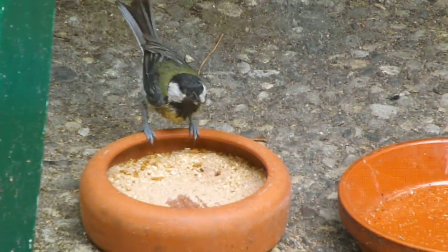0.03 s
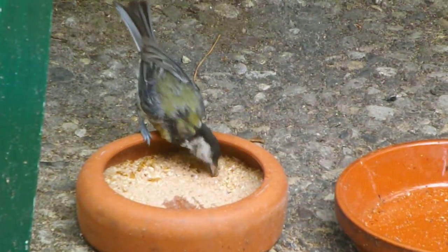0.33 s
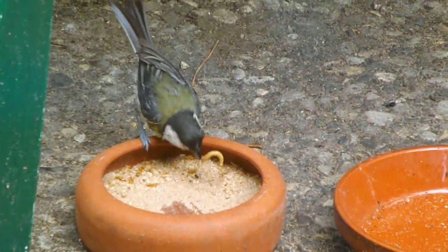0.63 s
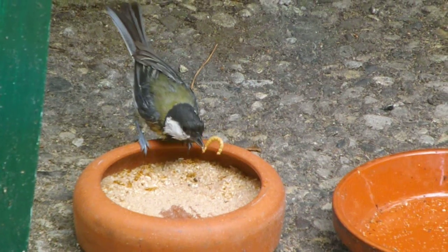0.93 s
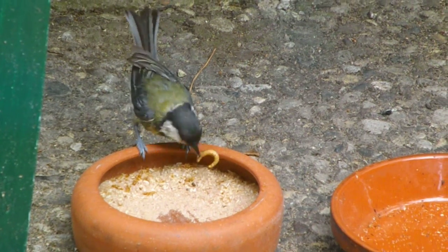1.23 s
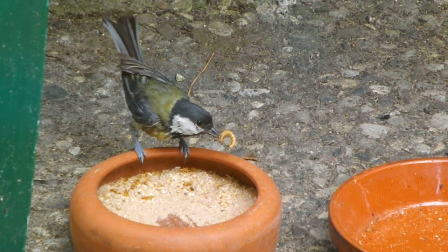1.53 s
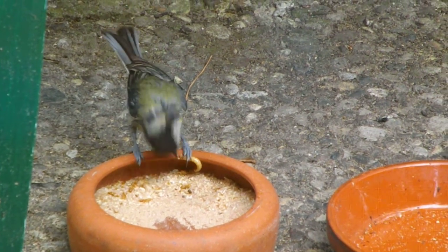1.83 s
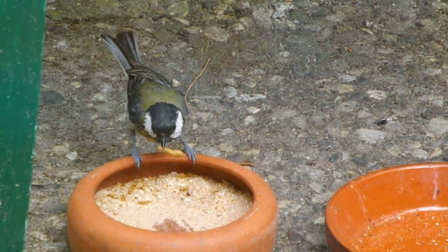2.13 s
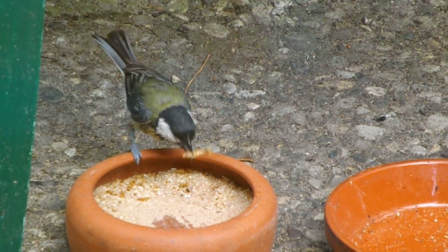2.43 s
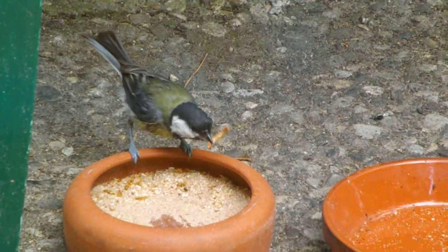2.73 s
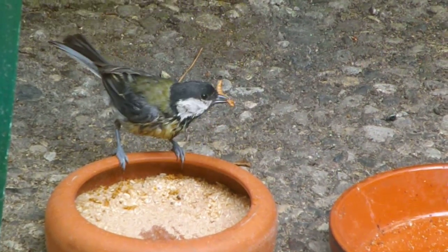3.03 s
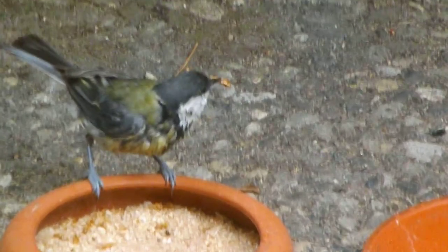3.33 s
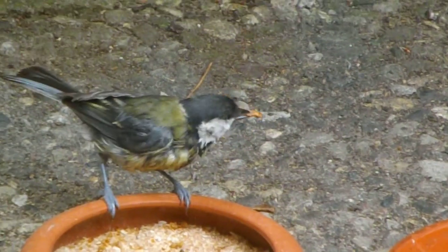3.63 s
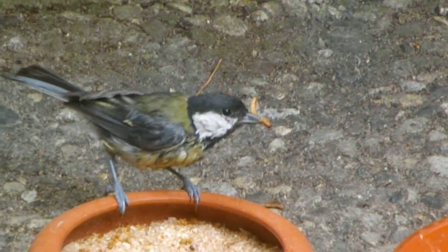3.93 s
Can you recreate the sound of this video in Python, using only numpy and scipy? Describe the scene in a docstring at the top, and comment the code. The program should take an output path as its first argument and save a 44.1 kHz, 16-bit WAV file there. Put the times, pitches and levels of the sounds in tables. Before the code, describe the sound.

Small bird picking at a clay bowl, with sparse ticks, faint scuffs and one sharp click.

```python
"""Small dry sounds come from close by, on a quiet patio. From the start there is an even hiss, with the thin
hum and whirr of a camera. Faint scuffs and light knocks come at 0.2 s and 1.2 s, then a scuff and a tiny squeak
near 2.2 s. From 2.5 s dry ticks ring briefly close to the microphone, with more scuffs between them. A lighter
tick at 3.14 s leads to one sharp double click near 3.28 s, and a last scuff fades away."""
import sys
import numpy as np
from scipy import signal
from scipy.fft import rfft, irfft
from scipy.io import wavfile
from scipy.ndimage import uniform_filter1d

SR = 44100
rng = np.random.default_rng(int(sys.argv[2]) if len(sys.argv) > 2 else 0)


def dump_mix(stems):
    """Bounce the given channels to the path in sys.argv[1] as a 16-bit WAV at rate SR."""
    frames = np.atleast_2d(stems).T  # one column per channel
    limited = np.clip(frames, -1, 1)  # hard clip at full scale
    pcm = np.round(limited * 32767).astype(np.int16)
    wavfile.write(sys.argv[1], SR, pcm)


N = 4 * SR

# Each small contact in a dry tick: t/s, relative level/dB, bass cut f/Hz, treble cut f/Hz
CONTACTS = [(2.5102, -20.5, 1450, 1700), (2.5160, -15, 1500, 1750), (2.6206, -27, 1750, 2600),
            (2.6228, -29, 1750, 2000), (2.6278, -31, 1800, 2600), (2.6366, -21, 1800, 2000),
            (2.6418, -32, 1800, 2600), (2.6820, -38, 2200, 3500), (2.7770, -38, 1700, 3000),
            (3.1382, -10, 1900, 2000), (3.1402, -15, 2500, 2000), (3.2450, -34, 1700, 3200),
            (3.2735, -16, 500, 2730), (3.27489, -9.5, 500, 10000), (3.27514, 2, 500, 3420),
            (3.27694, .8, 500, 2440), (3.27959, -21, 500, 4600), (3.2825, -21, 500, 3260)]
# The short tones of a dry tick: f/Hz, relative level/dB, time to fade by 60 dB t/s
TICK_TONES = [(1510, -11, .023), (1710, 4, .007), (2100, -15, .0136), (2654, -20, .03), (2862, -5.6, .0062),
              (3261, -16, .0176), (3700, -23, .02), (4291, -30, .022), (4800, -12.5, .0065),
              (6456, -25, .013), (8061, -33, .007)]
def ticks():
    """Every contact rings the same short tones. Strong ones close together make the sharp click."""
    t, out = np.arange(0, .06, 1 / SR), np.zeros(N)
    rise = 1 - np.exp(-t / .0002)
    ring = cut(rise * ringing(t, TICK_TONES), 2030, "high", order=4)
    for start, db, bass_hz, treble_hz in CONTACTS:
        thinned = cut(ring, bass_hz, "high", order=6)
        add(out, start, amp(db) * cut(thinned, treble_hz, "low", order=2))
    return out


# Each scuff: start t/s, length t/s, scrape level/dB, thud level/dB, pitch f/Hz, band width f/Hz
SCUFF_STROKES = [(.218, 0.024, -53.5, -73, 2700, 600), (0.26, 0.0096, -51.5, -64, 2580, 300),
                 (1.194, 0.022, -56, -80, 2770, 350), (1.219, 0.0054, -44, -58, 2720, 700),
                 (1.234, 0.0069, -50, -58, 2800, 550), (1.249, 0.012, -53.5, -78, 2730, 700),
                 (1.262, 0.0054, -43.5, -68, 2480, 280), (2.209, 0.048, -56, -63, 2730, 750),
                 (2.519, 0.04, -57, -75, 2750, 750), (2.615, 0.022, -51, -72, 2570, 900),
                 (2.678, 0.065, -58, -82, 2730, 800), (3.096, 0.054, -56.5, -83, 2720, 795),
                 (3.213, 0.085, -52, -61, 2750, 850), (3.30, 0.059, -57, -76, 2780, 500)]
# The scrape's weaker bands, then the thud's bands: centre f/Hz, width f/Hz, relative level/dB
SCRAPE_BANDS = [(1840, 95, -12), (4400, 560, -15)]
THUD_BANDS = [(592, 37, 5.5), (960, 630, -8.5)]
def scuffs():
    """Many tiny slips blur into a bright scrape, with its own pitch each time, and a dull thud."""
    slips_per_s, spread_db = 2500, 2.5
    rise_s, fall_s = .003, .006
    t, out = np.arange(0, .2, 1 / SR), np.zeros(N)
    for start, length, scrape_db, thud_db, hz, width in SCUFF_STROKES:
        slips = (rng.random(len(t)) < slips_per_s / SR) * rng.choice([-1, 1], len(t))
        slips = slips * amp(spread_db * rng.standard_normal(len(t)))
        scrape = unit(resonate(slips, [(hz, width, 0)]) + resonate(slips, SCRAPE_BANDS))
        thud = unit(resonate(slips, THUD_BANDS))
        rise = np.minimum(t / rise_s, 1)
        fall = np.exp(-np.maximum(t - length, 0) / fall_s)
        add(out, start, rise * fall * (amp(scrape_db) * scrape + amp(thud_db) * thud))
    return out


# Each knock: t/s, relative level/dB
LIGHT_KNOCKS = [(.235, -58), (1.2218, -53), (1.23, -50)]
# A knock's tones: f/Hz, relative level/dB, time to fade by 60 dB t/s
KNOCK_TONES = [(1166, 0.5, 0.1), (1460, -6, .06), (1800, -1.5, 0.1), (3000, 1.5, 0.083)]
def knocks():
    """Light knocks leave a faint ring that lasts a little longer than a tick."""
    t, out = np.arange(0, .2, 1 / SR), np.zeros(N)
    ring = ringing(t, KNOCK_TONES)
    for start, db in LIGHT_KNOCKS:
        add(out, start, amp(db) * ring)
    return cut(out, 990, "high", order=3)


# The squeak at its loudest: t/s, f/Hz, level/dB
SQUEAK = (2.268, 7300, -61)
def squeak():
    """A narrow band of high noise swells and fades as one faint, breathy squeak."""
    peak_s, hz, db = SQUEAK
    swell_s, width_hz = .015, 700
    swell = np.exp(-((np.arange(N) / SR - peak_s) / swell_s) ** 2)
    breath = unit(resonate(rng.standard_normal(N), [(hz, width_hz, 0)]))
    return amp(db) * swell * breath


# The hum's tones: f/Hz, level/dB
HUM_TONES = [(49, -84.5), (392, -73), (440.6, -72.5)]
# The whirr's bands: centre f/Hz, width f/Hz, relative level/dB
WHIRR_BANDS = [(1780, 180, -18), (2860, 375, 8), (4026, 280, 2.5)]
def camera():
    """Three wavering tones make a thin hum, and bands of noise make a soft whirr."""
    hum, waver_hz = np.zeros(N), 1.06
    for hz, db in HUM_TONES:
        pitch = hz + waver_hz * drift(samples=2000)
        hum += amp(db) * np.sqrt(2) * np.sin(2 * np.pi * np.cumsum(pitch) / SR)
    whirr = amp(-62.5) * unit(resonate(rng.standard_normal(N), WHIRR_BANDS))
    return hum + from_right(whirr, lead_s=.000016)


# The hiss that left and right share, then the part where they differ: f/Hz, relative level/dB
SHARED_HISS = [(25, -16), (45, -11.5), (75, -13), (150, -7.5), (260, -8), (380, -3), (600, 0), (1200, -0.5),
               (1900, 2.5), (2350, 1), (3500, -0.5), (5000, -2.5), (9000, -4), (13000, -6.5), (15800, -10)]
SIDE_HISS = [(60, -50), (250, -46), (450, -30), (750, -21), (1200, -44), (2300, -70), (3500, -14),
             (5000, -5), (8000, -1.5), (12000, 1.5), (15800, -3)]
def hiss():
    """An even hiss with a slight flicker. Its low part sits in the middle, its high part spreads wide."""
    flicker_db = .23 * drift(samples=700)
    middle = amp(-55.5 + flicker_db) * noise(SHARED_HISS)
    side = amp(-60) * noise(SIDE_HISS)
    return np.array([middle + side, middle - side])


def amp(db):
    """Turns decibels into a number to multiply by."""
    return 10 ** (np.asarray(db) / 20)


def unit(x):
    """Scales a sound to an average strength (rms) of 1."""
    return x / np.sqrt(np.mean(x ** 2) + 1e-20)


def add(mix, start, sound):
    """Mixes a sound in at a start time in seconds."""
    part = mix[round(start * SR):][:len(sound)]
    part += sound[:len(part)]


def ringing(t, tones):
    """A struck object rings with pure tones, each fading at its own speed."""
    return sum(amp(db - 60 * t / fade_s) * np.sin(2 * np.pi * hz * t) for hz, db, fade_s in tones)


def noise(points):
    """Steady noise, shaped from low to high by the given points."""
    hz, db = np.transpose(points)
    shape_db = np.interp(np.log(np.fft.rfftfreq(N, 1 / SR) + 1), np.log(hz), db)
    return unit(irfft(rfft(rng.standard_normal(N)) * amp(shape_db), N))


def drift(samples):
    """A random wobble; smoothing over more samples makes it slower."""
    smoothed = uniform_filter1d(rng.standard_normal(N), samples, mode="wrap")
    return unit(uniform_filter1d(smoothed, samples, mode="wrap"))


def resonate(x, bands):
    """Keeps only the given bands of a sound and adds them up."""
    return sum(amp(db) * cut(x, [hz - width / 2, hz + width / 2], "band", order=2)
               for hz, width, db in bands)


def cut(x, hz, keep, order):
    """Keeps the "low", "high" or "band" part of a sound; a higher order cuts more sharply."""
    return signal.sosfilt(signal.butter(order, hz, keep, fs=SR, output="sos"), x)


def from_right(x, lead_s):
    """A sound from the right reaches the right ear a moment before the left."""
    delay = np.exp(-2j * np.pi * np.fft.rfftfreq(N, 1 / SR) * lead_s)
    return np.array([irfft(rfft(x) * delay, N), x])


def scene():
    """Small close sounds, a little to the right, over hum and hiss."""
    close_sounds = ticks() + scuffs() + knocks() + squeak()
    return from_right(close_sounds, lead_s=.000023) + camera() + hiss()


def record(dry):
    """Takes away the very highest treble, above 15800 Hz."""
    treble_cut = signal.firwin(511, 15800, window=("kaiser", 9), fs=SR)
    return signal.oaconvolve(dry, treble_cut[None], "same")


dry = scene()
out = record(dry)
dump_mix(out)
```